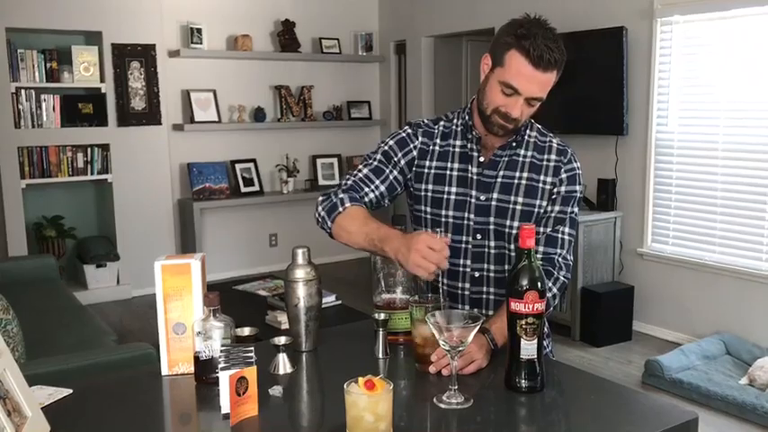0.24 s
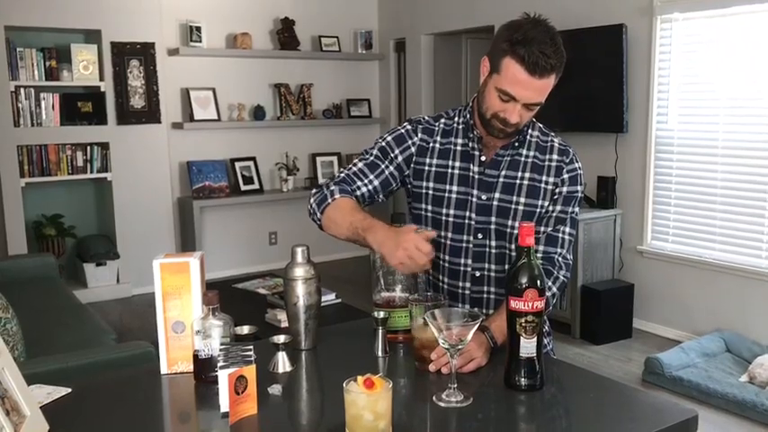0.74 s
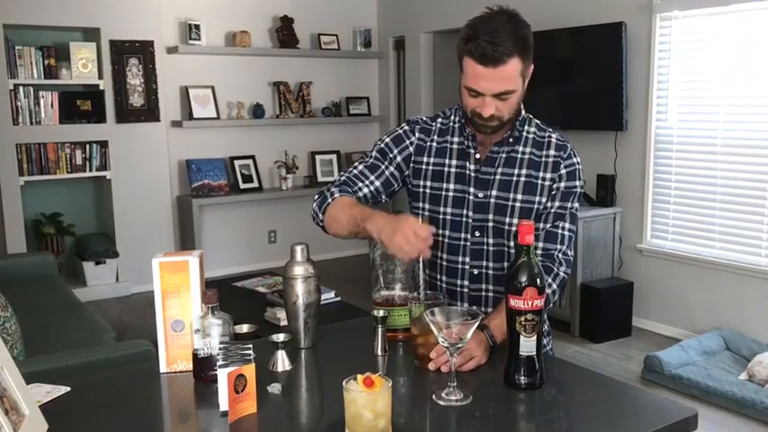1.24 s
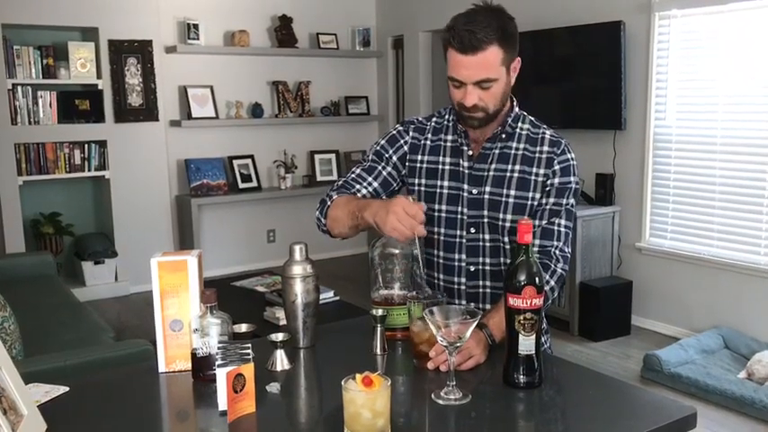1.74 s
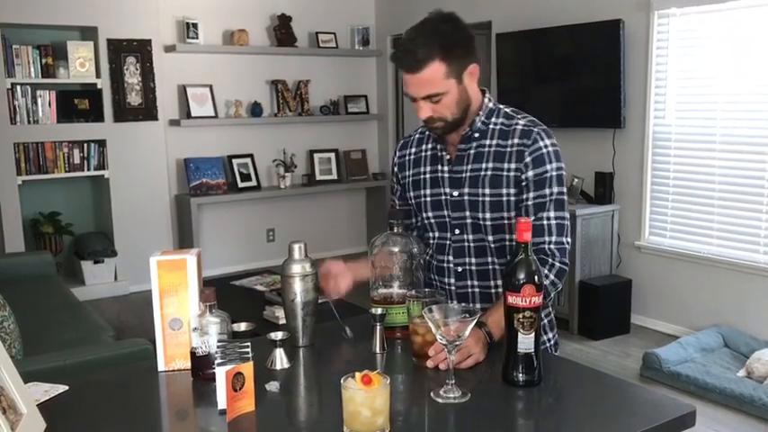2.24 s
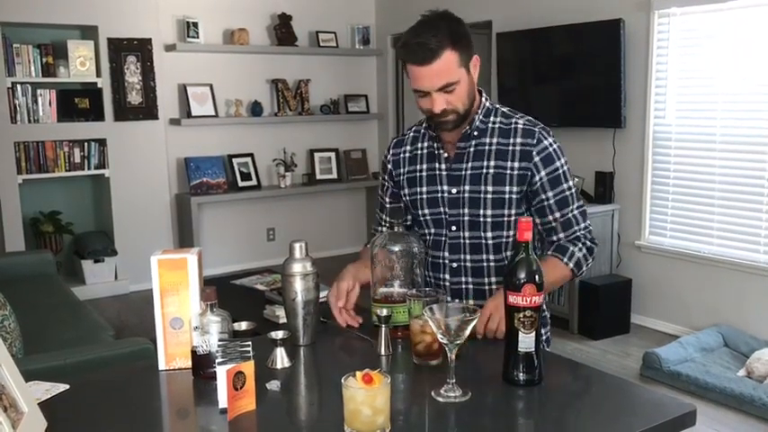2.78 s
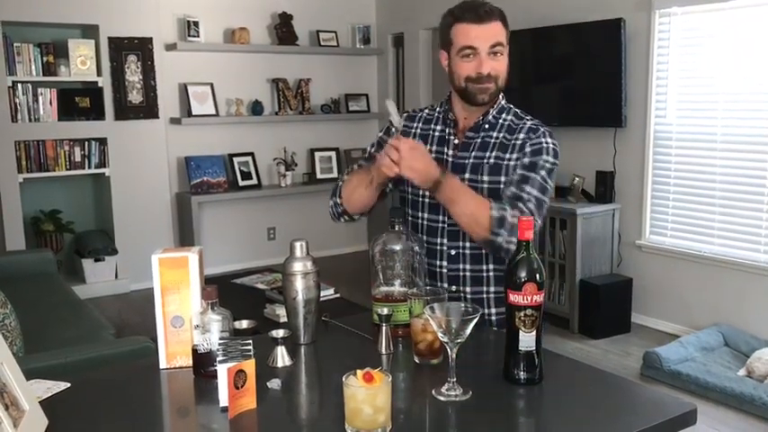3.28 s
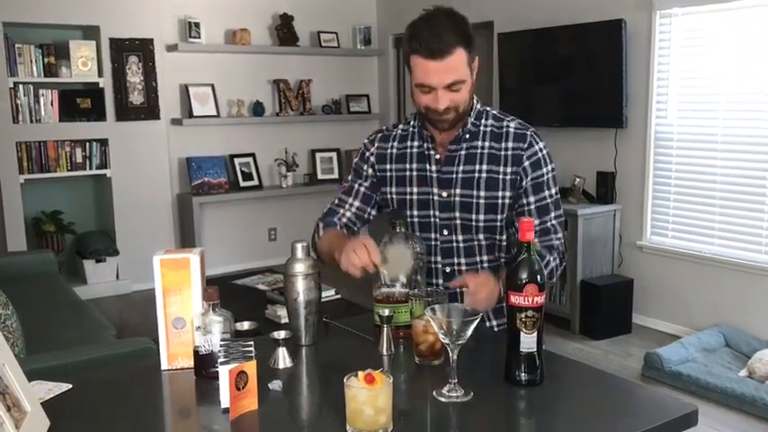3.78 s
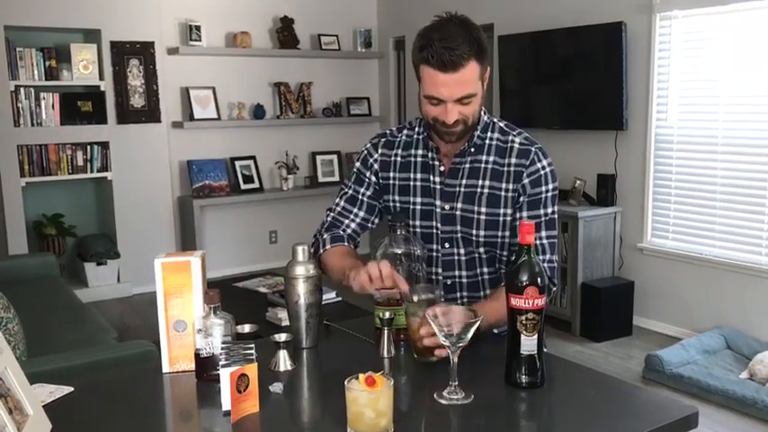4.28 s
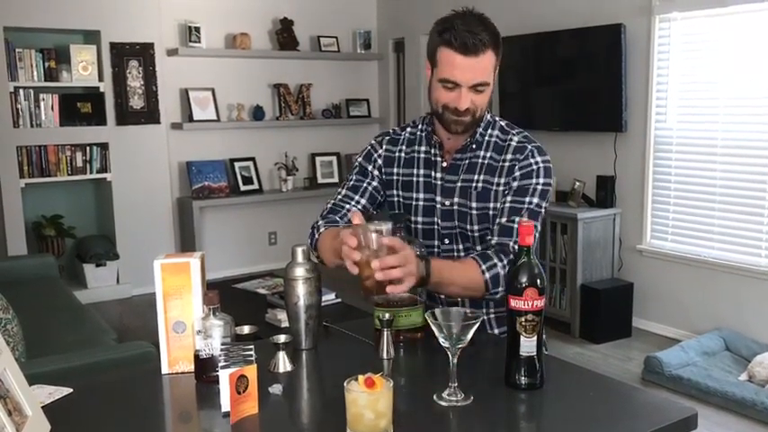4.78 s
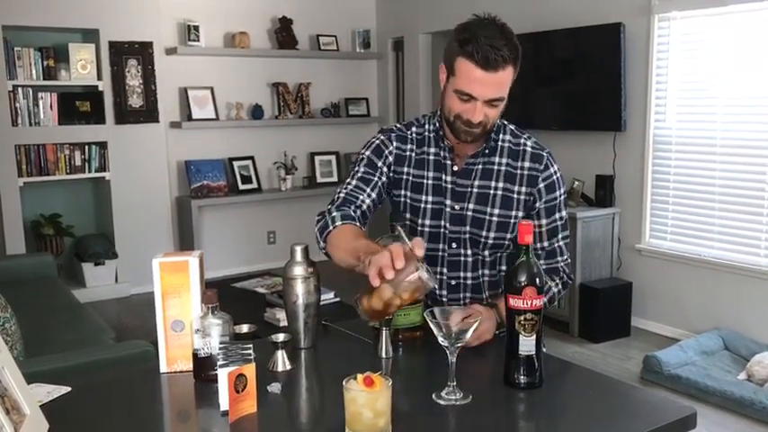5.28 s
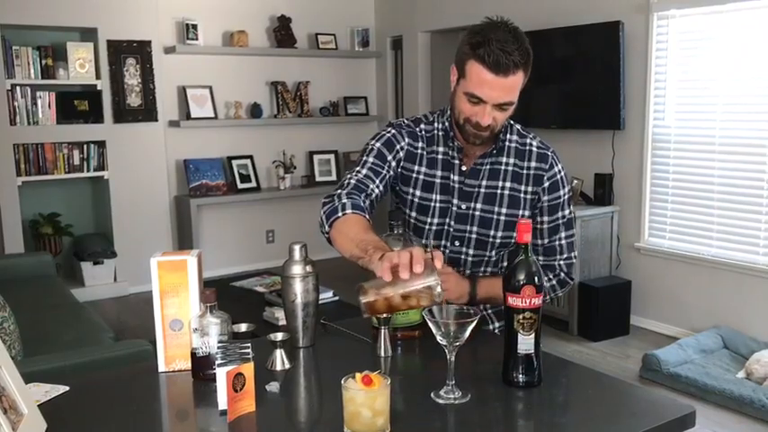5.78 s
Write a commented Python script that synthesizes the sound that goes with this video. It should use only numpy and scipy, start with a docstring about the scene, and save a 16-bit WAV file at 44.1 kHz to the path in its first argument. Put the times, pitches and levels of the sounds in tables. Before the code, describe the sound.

In a slightly echoing living room with a low appliance hum, a cocktail is stirred with quick clinks of ice on glass. The spoon rings the rim once, then rattles down on a countertop. After a light metallic tick, a strainer clacks into the glass, the cubes shift, and a thin, quiet stream pours out with a few small drips. The microphone stands a few steps away.

```python
"""Stirring and straining a cocktail

A bar spoon knocks ice against a mixing glass, clinks the rim on its way out and clatters on the counter.
A steel strainer ticks in the hands and scrapes into the glass; ice slips and the drink trickles out.
Contacts are noise clicks plus decaying modes of glass, steel or ice; the trickle is ringing bubbles.
A live living room with a low appliance hum, heard in mono from a few steps away."""
import sys
import numpy as np
from scipy import signal
from scipy.fft import rfft, irfft
from scipy.io import wavfile

SR = 44100
rng = np.random.default_rng(int(sys.argv[2]) if len(sys.argv) > 2 else 0)


def file_out(sig):
    """Save sig as 16-bit WAV at sys.argv[1]."""
    # one column per channel
    cols = np.atleast_2d(sig).T
    # limit, then scale
    lim = np.clip(cols, -1, 1)
    pcm = np.round(lim * 32767).astype(np.int16)
    wavfile.write(sys.argv[1], SR, pcm)


N = 265482
TIME_S = np.arange(N) / SR
RING_S = TIME_S[:SR]

# mixing glass modes, split into close groups by the thick wall: pitch_hz, level_db, t60_s
GLASS_MODES = np.transpose([[867, 1843, 1900, 2971, 4180, 4400, 4450, 4530, 7805, 7855, 7932, 12145, 14840], [-22, -3.5, -4.5, -29, -10.5, 2, -6, -4.5, -12, -11.5, -2.5,
                                               -9.5, -21.5], [0.053, 0.2, 0.019, 0.38, .1, 0.09, 0.27,
                                                                 .07, 0.072, 0.11, 0.062, 0.1, .13]])
# ice cube modes: pitch_hz, level_db, t60_s
CUBE_MODES = [(2840, -10.5, .022), (6390, -10.5, 0.028)]
# ice contact spectrum: freq_hz, density_db
ICE_SPECTRUM = [(150, -26), (300, -3.5), (700, -1.5), (1200, 0.5), (2200, 1.5), (3000, 1.5), (4500, -0.5),
                (6500, -1), (8500, -11.5), (10500, -14), (16000, -22.5)]
# cubes grinding past each other: time_s, level_db
GRIND_ENVELOPE = [(0, -58), (.2, -58.5), (.5, -54), (.62, -51.5), (1.08, -50), (1.2, -59), (1.35, -50.5),
                  (1.5, -77)]
# spoon on the rim: start_s, click_db, glass_db, tilt_db_per_oct, spoon_db
RIM_STRIKES = [(1.5100, -19.5, -13.5, 0.5, -29.5)]
# pitch groups of falling drops: pitch_hz, level_db, spread_ratio
DROP_GROUPS = [(1790, -10, 0.042), (2420, 0, 0.1), (3390, -9, 0.2), (4504, 4.5, 0.12), (6300, -4, 0.025),
               (6650, -9, .04)]


def from_db(db):
    return 10 ** (np.asarray(db) / 20)


def unit_rms(x):
    return x / np.sqrt(np.mean(x ** 2) + 1e-20)


def at_hz(points, hz):
    """Interpolate a table over log frequency."""
    freq_hz, value = np.transpose(points)
    return np.interp(np.log(np.maximum(hz, 1)), np.log(freq_hz), value)


def envelope(points):
    """Gain over time from rows of time_s, level_db."""
    return from_db(np.interp(TIME_S, *np.transpose(points)))


def add(track, start_s, sound):
    start = max(round(start_s * SR), 0)
    track[start:start + len(sound)] += sound[:N - start]


def convolve(x, response):
    return signal.fftconvolve(x, response)[:N]


def tilt_db(hz, db_per_oct):
    """Brightness slope about 4 kHz; harder contacts lift the treble."""
    return db_per_oct * np.log2(np.clip(hz, 800, SR) / 4000)


def noise(spectrum, size, db_per_oct=0):
    """Coloured noise, rms 1."""
    hz = np.fft.rfftfreq(size, 1 / SR)
    magnitude = from_db(at_hz(spectrum, hz) + tilt_db(hz, db_per_oct))
    return unit_rms(irfft(magnitude * np.exp(2j * np.pi * rng.random(len(hz))), size))


def click(spectrum, db, t60_s, db_per_oct=0, attack_s=0.0001):
    """Dense, heavily damped resonances of a contact; a glancing one builds more slowly."""
    t = RING_S[:SR // 8]
    attack = 1 - np.exp(-t / attack_s)
    return from_db(db - 60 * t / t60_s) * attack * noise(spectrum, len(t), db_per_oct)


def ring(modes, db, db_per_oct=0, vary_db=0, contact_hz=SR, detune=0):
    """Decaying sines, varied per blow; a soft contact barely excites modes above contact_hz."""
    hz, mode_db, t60_s = np.transpose(modes)
    weight, shift = rng.standard_normal((2, len(hz)))
    gain = from_db(db + mode_db + tilt_db(hz, db_per_oct) + vary_db * weight)
    gain *= rng.choice([-1, 1], len(hz)) / np.sqrt(1 + (hz / contact_hz) ** 6)
    t = RING_S.astype("float32")
    phase = np.outer(np.float32(2 * np.pi * hz * (1 + detune * shift)), t)
    log_decay = np.outer(np.float32(-np.log(1000) / t60_s), t)
    return gain @ (np.sin(phase) * np.exp(np.maximum(log_decay, -20)))


def grains(per_s, spread_db):
    """Random impulses of uneven size."""
    sizes = from_db(spread_db * np.minimum(rng.exponential(1, N), 4)) * rng.choice([-1, 1], N)
    return sizes * (rng.random(N) < per_s / SR)


def stirring():
    """Cubes and spoon knock on the wall, harder contacts brighter; the ice grinds softly underneath."""
    # louder knocks: start_s, level_db, glass_db, relative_treble_db
    knocks = [(0.0024, -18.5, -38, -10.5), (0.0122, -16, -35.5, -11), (0.0839, -31, -45, -24),
              (0.1628, -38.5, -49, -29), (0.2461, -29, -56, -19), (0.3073, -30, -42, -15),
              (0.3892, -36, -45.5, -24), (0.5083, -30.5, -55, -23), (0.5759, -29, -54.5, -27.5),
              (0.5896, -34.5, -41.5, -30), (0.6595, -16, -42, -20.5), (0.6715, -22, -40, -17.5),
              (0.7047, -23.5, -42, -21.5), (0.8116, -29, -45, -23.5), (0.8797, -26.5, -45.5, -20),
              (0.9497, -31.5, -49.5, -15.5), (1.0112, -26, -41.5, -18.5), (1.0281, -29, -41, -19.5),
              (1.0514, -31, -45.5, -20), (1.1108, -34.5, -47, -21), (1.2364, -35, -51, -25)]
    # spoon bowl catching a cube: start_s, level_db
    pings = [(.003, -42.5), (0.881, -39.5), (1.063, -39.5)]
    # submerged bowl modes: pitch_hz, level_db, t60_s
    wet_spoon_modes = [(6360, 2, 0.34), (13784, -26, .1)]
    usual_treble_db = -20.5
    # leaning ice shortens the ring; swirling liquid detunes it
    loaded_glass = [(hz, db, 0.69 * t60_s) for hz, db, t60_s in GLASS_MODES]
    out = np.zeros(N)
    for start_s, db, glass_db, treble_db in list(knocks) + jostles(usual_treble_db):
        db_per_oct = 1.6 + 0.67 * (treble_db - usual_treble_db)
        add(out, start_s, click(ICE_SPECTRUM, db - 2, 0.026, db_per_oct, attack_s=0.0007))
        add(out, start_s, ring(CUBE_MODES, db, vary_db=2, detune=0.07))   # cubes differ in size
        wall = ring(loaded_glass, glass_db + 4.5, -2, vary_db=3, contact_hz=7800, detune=0.0082)
        add(out, start_s, wall)
    for start_s, db in pings:
        add(out, start_s, ring(wet_spoon_modes, db))
    rubbing = grains(per_s=640, spread_db=7)
    grind = convolve(rubbing, click(ICE_SPECTRUM, 0, t60_s=0.015, db_per_oct=-1.8))
    grind += convolve(rubbing, ring(loaded_glass, -26.5, db_per_oct=-7.5, contact_hz=8000))
    return out + envelope(GRIND_ENVELOPE) * unit_rms(grind)


def jostles(usual_treble_db, count=22, length_s=1.4, above_grind_db=8.5, spread_db=4.5):
    """Small random knocks that follow the grinding: start_s, level_db, glass_db, relative_treble_db."""
    jitter, force, hardness = rng.random((count, 3)).T
    start_s = (np.arange(count) + jitter) / count * length_s
    grind_db = np.interp(start_s, *np.transpose(GRIND_ENVELOPE))
    db = grind_db + above_grind_db + spread_db * (2 * force - 1)
    return list(zip(start_s, db, db - 15, usual_treble_db + 7 * (2 * hardness - 1)))


def rim_clink():
    """Steel on the bare rim rings the glass fully."""
    # rim contact: freq_hz, density_db
    spectrum = [(150, -14), (300, -7), (800, -5.5), (1400, -0.5), (2200, 8), (3200, -1), (4400, 7.5),
                (5600, 3.5), (8300, 0), (9800, -13.5), (16000, -20)]
    out = np.zeros(N)
    for start_s, click_db, glass_db, db_per_oct, spoon_db in RIM_STRIKES:
        add(out, start_s, click(spectrum, click_db, t60_s=0.053, db_per_oct=db_per_oct))
        add(out, start_s, ring(GLASS_MODES, glass_db))
        add(out, start_s, ring(spoon_modes(position=0.82), spoon_db, contact_hz=5000))
    return out


def rim_crack(attack_s=0.0005):
    """The clink's first burst leaves the open top straight towards the listener."""
    # hard rim contact: pitch_hz, level_db, t60_s
    modes = [(1850, -28, .03), (4492, -4, 0.025), (8380, -33, .03)]
    out = np.zeros(N)
    add(out, RIM_STRIKES[0][0], ring(modes, 0) * (1 - np.exp(-RING_S / attack_s)))
    return out


def spoon_drop(drain_db_per_s=77.5):
    """The spoon clatters on bowl and handle, then bounces to rest as the counter drains its ring."""
    # touches on the counter: start_s, click_db, ring_db, position (0 handle, 1 bowl)
    touches = [(2.366, -23, -40.5, 0.86), (2.432, -26, -46, .8), (2.5355, -19, -21.5, .09),
               (2.575, -24.5, -33, .02), (2.6745, -24.5, -38.5, .02), (2.7463, -27.5, -44, .58),
               (2.7645, -27.5, -34, 0.85), (2.768, -17.5, -22, 1)]
    # steel contact: freq_hz, density_db
    spectrum = [(40, -42.5), (150, -20.5), (270, -3), (400, -21.5), (800, -2.5), (1500, 2.5), (2500, 1),
                (4200, 2.5), (5500, -1), (8500, 0.5), (10300, -3.5), (12500, 1.5), (16000, -4)]
    last_fall = touches[-1]
    out = np.zeros(N)
    for start_s, click_db, ring_db, position in touches + bounces(last_fall):
        add(out, start_s, click(spectrum, click_db, t60_s=0.05, db_per_oct=-1.7, attack_s=0.00057))
        steel = ring(spoon_modes(position), ring_db, vary_db=2, detune=0.001)
        lying_s = np.maximum(start_s + RING_S - max(start_s, last_fall[0]), 0)
        add(out, start_s, steel * from_db(-drain_db_per_s * lying_s))
    return out


def spoon_modes(position):
    """The contact position, 0 handle to 1 bowl, weights the spoon's modes."""
    # bar spoon modes: pitch_hz
    pitch_hz = [2222, 4958, 5490, 6388, 6705, 6890, 7712, 7790, 8402, 10609, 10815, 11362, 12184, 12660,
                13010, 13581, 13784, 14880, 15070, 15478]
    # response per mode: handle_db, bowl_db, t60_s
    response = [(-3, -14, 0.16), (0, -32.5, 0.22), (-35.5, -18, 0.21), (-2.5, 4, 0.27), (-32, -16.5, 0.23),
                (-29, -8, 0.13), (1.5, -25.5, 0.085), (-2.5, -34, 0.11), (-31.5, -2, 0.41),
                (-38.5, -3, 0.18), (-14, -32, 0.22), (-8, -10, 0.18), (-9.5, -1.5, 0.25),
                (-40.5, -15.5, .17), (-30.5, -17.5, .17), (-39, -3, 1), (-45.5, -6.5, .2), (-30, -19.5, .1),
                (-17, -26, .15), (-4.5, -31, .15)]
    handle_db, bowl_db, t60_s = np.transpose(response)
    return np.transpose([pitch_hz, handle_db + position * (bowl_db - handle_db), t60_s])


def bounces(fall, count=6, flight_s=0.077, restitution=0.68, loss_db=3.5, damping_db=5.5):
    """Ever quicker, weaker touches after a fall; the counter damps their ring."""
    fall_s, click_db, ring_db, position = fall
    k = np.arange(count)
    times_s = fall_s + np.cumsum(flight_s * restitution ** k)
    return [(start_s, click_db - db, ring_db - db - damping_db, position)
            for start_s, db in zip(times_s, loss_db * (k + 1))]


def strainer(coil_start_s=4.148, coil_length_s=0.048, coil_db=-40.5):
    """The strainer ticks in the hands, then knocks on glass and ice as its coil scrapes in."""
    # handling ticks: start_s, click_db, ring_db, tilt_db_per_oct
    ticks = [(3.338, -41, -47.5, 0.5), (3.598, -65, -66, 0.5), (3.650, -62, -73, 2.5)]
    # knocks on the glass: start_s, click_db, glass_db, tilt_db_per_oct
    knocks = [(3.957, -37.5, -52, 1), (4.141, -36, -60, 0), (4.151, -26.5, -53, 4),
              (4.159, -25, -36.5, 4.5), (4.18, -52, -34, -3.5), (4.263, -24, -28.5, -4)]
    # strainer contact: freq_hz, density_db
    spectrum = [(200, -44.5), (900, -10), (2000, -6.5), (3000, -2), (6000, 0.5), (8500, 3), (10500, -0.5),
                (13000, 3), (16000, -1.5)]
    # strainer modes: pitch_hz, level_db, t60_s
    steel_modes = [(2940, -16, .06), (4020, -4, 0.18), (5970, -3, 0.26), (6160, -11, 0.27), (6060, 3, 0.1),
                   (9100, -4, 0.17), (11600, -10, .12)]
    # coil squeak: pitch_hz, level_db, t60_s
    coil_modes = [(1038, 1, 0.035), (1190, -1, .05), (2770, -0.18, 0.0069)]
    out = np.zeros(N)
    for start_s, click_db, ring_db, db_per_oct in ticks:
        add(out, start_s, click(spectrum, click_db, t60_s=0.26, db_per_oct=db_per_oct))
        add(out, start_s, ring(steel_modes, ring_db))
    for start_s, click_db, glass_db, db_per_oct in knocks:
        add(out, start_s, click(spectrum, click_db, 0.053, db_per_oct, attack_s=0.0008))
        wall = ring(gripped_glass(), glass_db, db_per_oct + 7, vary_db=2, contact_hz=8100, detune=0.0094)
        add(out, start_s, wall)
        add(out, start_s, ring(CUBE_MODES, click_db - 3.5, contact_hz=5000, detune=0.03))
    slips = grains(per_s=660, spread_db=1.5)
    squeak = unit_rms(convolve(slips, ring(coil_modes, 0)))
    scrape = unit_rms(convolve(slips, click(spectrum, 0, t60_s=0.026)))
    sliding = (TIME_S > coil_start_s) & (TIME_S < coil_start_s + coil_length_s)
    return out + from_db(coil_db) * sliding * (squeak + from_db(1) * scrape)


def gripped_glass():
    """Glass modes damped by the hand."""
    return [(hz, db, min(t60_s, 0.04)) for hz, db, t60_s in GLASS_MODES]


def counter():
    """The counter top knocks under heavier blows; the stiff slab radiates little bass."""
    # blows: start_s, thud_db, t60_s, ring_db
    blows = [(1.513, -27.5, 0.085, -51.5), (2.540, -32.5, 0.036, -17.5), (2.769, -34, 0.13, -38),
             (2.846, -44, 0.13, -27.5), (4.194, -27.5, 0.097, -30), (4.266, -32, 0.035, -30.5)]
    # slab thud: freq_hz, density_db
    spectrum = [(60, -34), (130, -20), (200, -15), (275, -5), (380, -13), (560, -1), (750, -2),
                (1150, -3.5), (1800, -12), (4000, -35), (16000, -60)]
    # slab modes: pitch_hz, level_db, t60_s
    modes = [(274, -11, .1), (535, -6, .028), (604, -1, .035), (690, -1, .03)]
    out = np.zeros(N)
    for start_s, thud_db, t60_s, ring_db in blows:
        add(out, start_s, click(spectrum, thud_db, t60_s))
        add(out, start_s, ring(modes, ring_db, detune=0.0061))
    return signal.sosfilt(signal.butter(2, 150, "high", fs=SR, output="sos"), out)


def ice_slips(tick_db=-4.5, tick_t60_s=0.027):
    """Cubes slip in the tilted glass; each tick briefly rings the glass, strongest at one pitch."""
    # ticks on the glass: start_s, level_db, strongest_pitch_hz
    slips = [(4.667, -41.5, 1840), (4.7388, -45, 4600), (4.7722, -47, 1930), (4.8065, -44.5, 4600),
             (4.8943, -41.5, 4230), (5.0633, -53.5, 2340), (5.167, -58, 4430), (5.4514, -64.5, 2260),
             (5.5364, -50, 4700), (5.691, -56, 4670), (5.713, -55, 4260)]
    out = np.zeros(N)
    for start_s, db, hz in slips:
        add(out, start_s, click(ICE_SPECTRUM, db - 6, t60_s=0.053, db_per_oct=1.4, attack_s=0.003))
        wall = ring(gripped_glass(), db - 12, db_per_oct=0.65, vary_db=3, contact_hz=6500, detune=0.012)
        add(out, start_s, wall)
        add(out, start_s, ring([(hz, tick_db, tick_t60_s)], db))
    return out


def trickle(count=480, cycles=30, rise=0.0087):
    """Tiny bubbles ring and rise in pitch as they surface, over a fine patter."""
    # thin stream: time_s, level_db
    flow = [(4.6, -100), (4.68, -73), (4.9, -71.5), (5.35, -72), (5.45, -73.5), (6.02, -71.5)]
    first_s = flow[0][0]
    out = np.zeros(N)
    for k, (when, scatter, faintness) in enumerate(rng.random((count, 3))):
        centre_hz, db, spread = DROP_GROUPS[k % len(DROP_GROUPS)]
        hz = centre_hz * (1 + spread * (2 * scatter - 1))
        age = RING_S[:SR // 25] * hz / cycles   # 1 at 30 dB of decay
        bubble = np.sin(2 * np.pi * cycles * age * (1 + rise * age)) * from_db(-30 * age)
        add(out, first_s + when * (TIME_S[-1] - first_s), from_db(db - 20 * faintness) * bubble)
    bubbles = out / np.std(out[TIME_S > first_s])
    patter = convolve(grains(per_s=290, spread_db=5), click(ICE_SPECTRUM, 0, t60_s=0.0023))
    return envelope(flow) * (bubbles + unit_rms(patter))


def drips(count=8, first_s=5.009, interval_s=0.055, jitter_s=0.0036):
    """Larger drops plink into the cocktail glass in an uneven, fading run."""
    modes = [(hz, db, 0.035) for hz, db, _ in DROP_GROUPS]
    out = np.zeros(N)
    for k, late in enumerate(rng.standard_normal(count)):
        start_s = first_s + k * interval_s + late * jitter_s
        db = -58 - 0.5 * k
        add(out, start_s, click(ICE_SPECTRUM, db, t60_s=0.011))
        add(out, start_s, ring(modes, db, db_per_oct=-3.1, vary_db=3.5, detune=0.032))
    return out


def background(air_db=-62):
    """Steady air noise and the slightly wavering hum of an appliance."""
    # room air: freq_hz, density_db
    air_spectrum = [(15, -40.5), (25, -9.5), (70, -1), (102, -12), (175, -12.5), (384, -9.5), (427, -19),
                    (677, -20.5), (962, -26.5), (1260, -30), (2000, -33), (4490, -35.5), (7310, -41.5),
                    (7920, -36), (16000, -43)]
    # appliance tones: pitch_hz, level_db
    hum_tones = [(80.7, -62), (118.4, -74.5), (242.2, -70), (333.8, -87), (376.8, -67), (473.7, -79),
                 (532.9, -80.5)]
    out = from_db(air_db) * noise(air_spectrum, N)
    for hz, db in hum_tones:
        waver_rad = 0.6 * np.interp(TIME_S, np.linspace(0, TIME_S[-1], 40), rng.standard_normal(40))
        out += np.sqrt(2) * from_db(db - 2.5) * np.sin(2 * np.pi * hz * TIME_S + waver_rad)
    return out


def room(x, tail_db=-3, early_db=-12, early_t60_s=0.25, gap_s=0.0018):
    """Near surfaces add quick echoes, the walls a tail that dies sooner in the treble."""
    # tail decay: freq_hz, t60_s
    decay = [(150, 0.44), (530, 0.74), (1400, 0.72), (3700, 0.67), (7000, 0.61), (10000, 0.55),
             (16000, 0.3)]
    # tail colour: freq_hz, level_db
    colour = [(100, 2), (500, 0.5), (2000, -0.5), (5000, -1), (10000, -4), (16000, -1.5)]
    hz = np.fft.rfftfreq(SR, 1 / SR)
    white = rfft(rng.standard_normal(SR))
    centres_hz = np.geomspace(100, 16000, 12)
    tail = 0
    for centre_hz, share in zip(centres_hz, np.eye(len(centres_hz))):
        band = irfft(white * at_hz(np.transpose([centres_hz, share]), hz), SR)
        tail += band * from_db(at_hz(colour, centre_hz) - 60 * RING_S / at_hz(decay, centre_hz))
    early = rng.standard_normal(SR) * from_db(-60 * RING_S / early_t60_s)
    onset = np.clip(RING_S / gap_s - 1, 0, 1)
    response = from_db(tail_db) * unit_rms(tail * onset) + from_db(early_db) * unit_rms(early * onset)
    return x + convolve(x, response / np.sqrt(SR))


def scene():
    """The bar sounds through the room, the rim crack direct; both channels are the same."""
    bar = stirring() + rim_clink() + spoon_drop() + strainer() + counter()
    bar += ice_slips() + trickle() + drips()
    return np.tile(room(from_db(-3.5) * bar) + rim_crack() + background(), (2, 1))


def record(dry, low_hz=30, high_hz=15900):
    """Steep cuts of the deepest rumble and the top."""
    dry = signal.sosfilt(signal.butter(4, low_hz, "high", fs=SR, output="sos"), dry)
    return signal.sosfilt(signal.ellip(10, 0.1, 80, high_hz, fs=SR, output="sos"), dry)


dry = scene()
out = record(dry)
file_out(out)
```